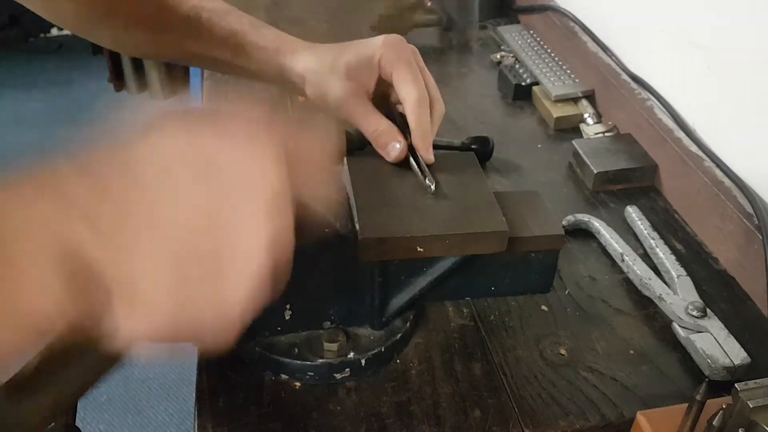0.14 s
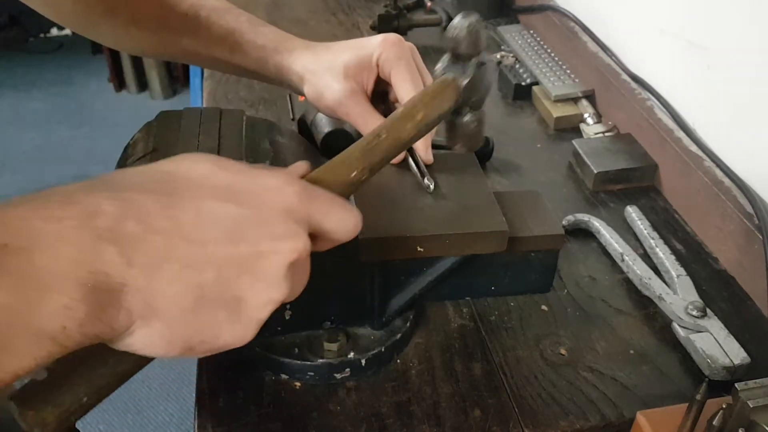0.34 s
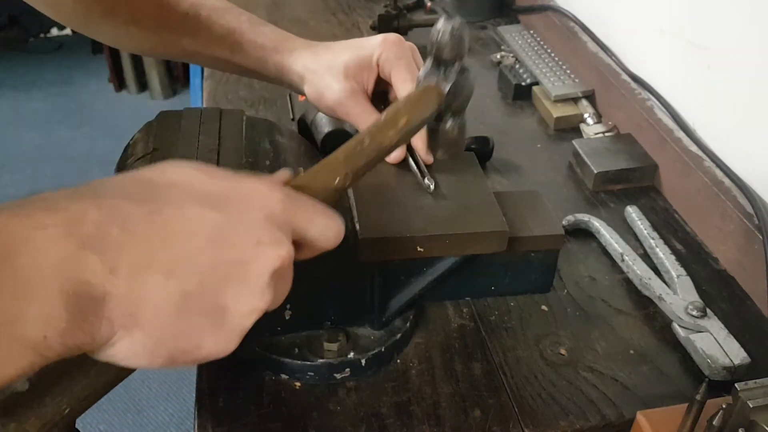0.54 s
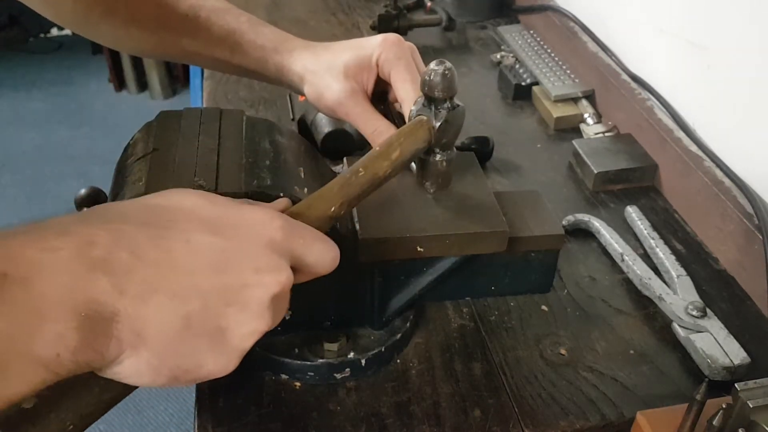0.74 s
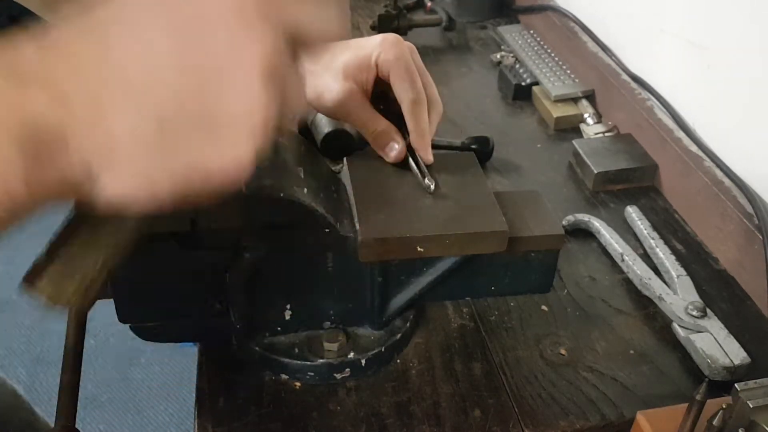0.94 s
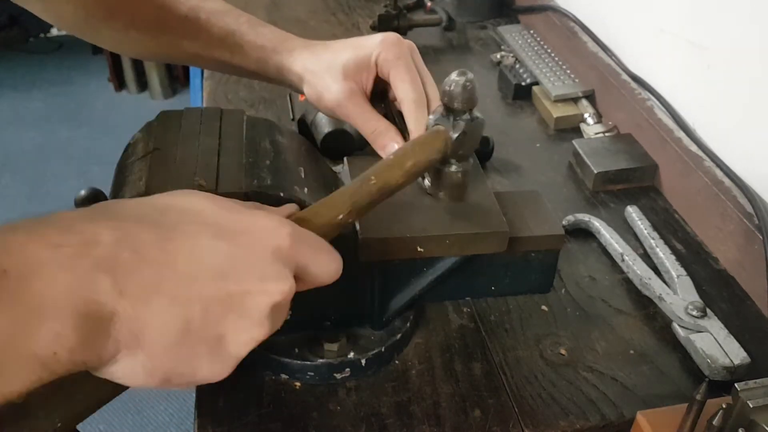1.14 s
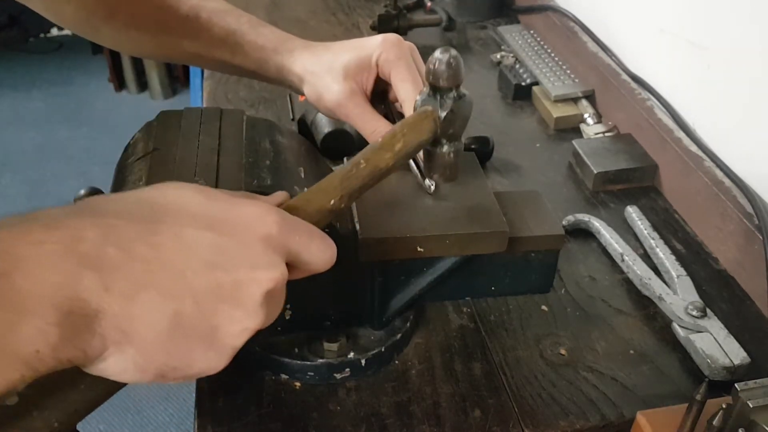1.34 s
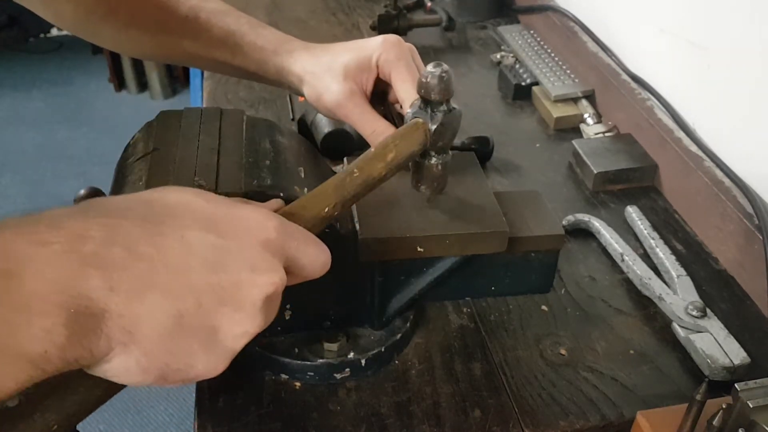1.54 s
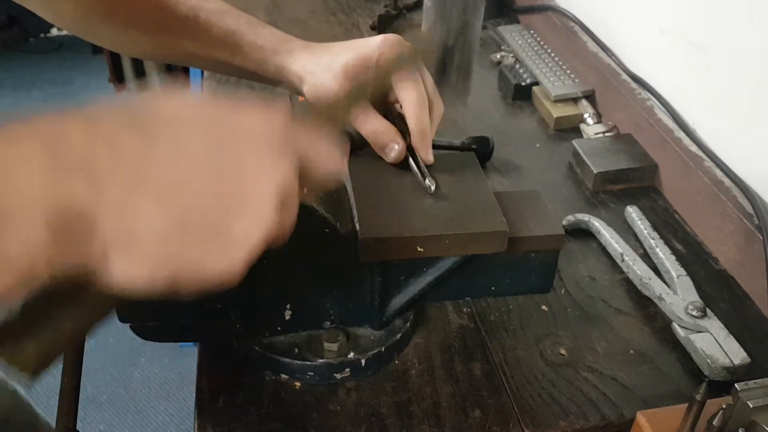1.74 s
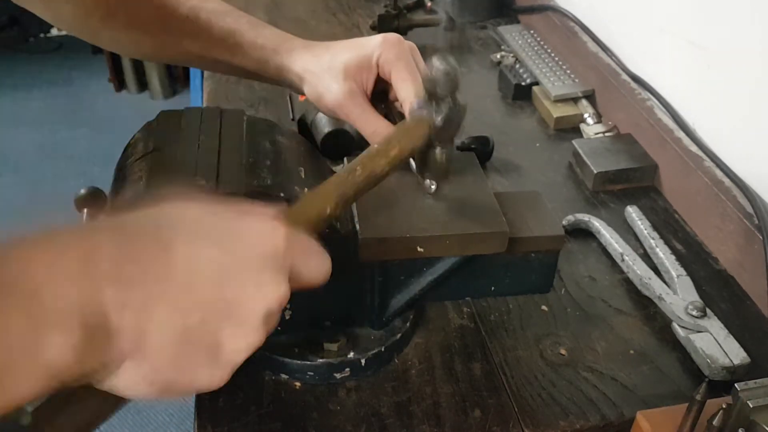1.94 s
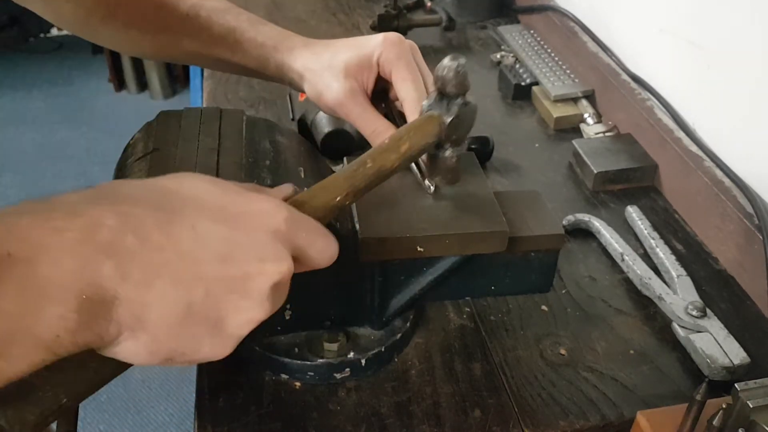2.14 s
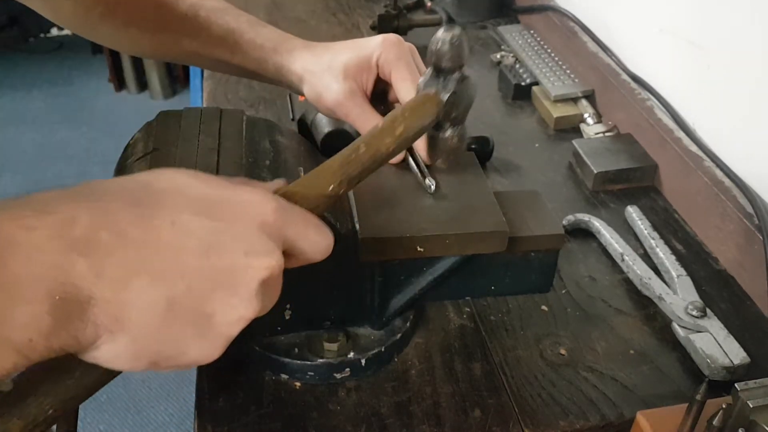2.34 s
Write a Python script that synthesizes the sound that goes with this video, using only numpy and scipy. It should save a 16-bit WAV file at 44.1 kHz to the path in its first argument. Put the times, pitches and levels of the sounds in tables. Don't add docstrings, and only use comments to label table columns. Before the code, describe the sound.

Hammer strikes a steel punch on a vice block: three hard ringing cracks, light taps between

```python
import sys
import numpy as np
from scipy import signal
from scipy.fft import rfft, irfft, next_fast_len
from scipy.io import wavfile
from scipy.ndimage import uniform_filter1d

SR = 44100
rng = np.random.default_rng(int(sys.argv[2]) if len(sys.argv) > 2 else 0)


def store_wav(level_fs):
    pcm = np.round(np.clip(np.atleast_2d(level_fs), -1, 1) * 32767)
    wavfile.write(sys.argv[1], SR, pcm.T.astype(np.int16))


def gain_from_decibels(decibels):
    exponent = np.asarray(decibels, float) / 20
    return 10 ** exponent


N = 105840

# frequency in Hz, t60 in seconds.
ROOM_DECAY = [(100, 0.58), (700, 0.43), (2000, 0.44), (4900, 0.32), (6500, 0.32), (10000, 0.18),
              (13000, 0.19), (15500, .27)]
# frequency in Hz, left-right likeness (1 = mono).
STEREO_LIKENESS = [(30, 0.27), (70, 1), (150, 0.94), (350, 0.86), (700, .3), (1500, 0.15), (5000, 0.03),
                   (12000, 0)]


def along(points, hz):
    f, v = np.transpose(points)
    return np.interp(np.log(hz + 1), np.log(f + 1), v)


def coloured(x, spectrum, tilt_db=0):
    m = 2 * next_fast_len(x.shape[-1] // 2 + 4096)
    hz = np.fft.rfftfreq(m, 1 / SR)
    response_db = along(spectrum, hz) + tilt_db * np.log2(hz / 1000 + .1)
    cepstrum = irfft(np.log(gain_from_decibels(response_db)), m)
    cepstrum = cepstrum * np.r_[1, np.full(m // 2 - 1, 2), 1, np.zeros(m // 2 - 1)]
    return irfft(rfft(x, m) * np.exp(rfft(cepstrum)), m)[..., :x.shape[-1]]


def add(track, s, sound):
    i = round(s * SR)
    first = max(i, 0)
    part = sound[..., max(-i, 0):][..., :N - first]
    track[..., first:first + part.shape[-1]] += part


def noise(size, spectrum, t60=None, tilt_db=0):
    raw = coloured(rng.standard_normal((2, size)), spectrum, tilt_db)
    hz, t, z = signal.stft(raw / raw.std(), SR, nperseg=512)
    likeness = np.clip(along(STEREO_LIKENESS, hz), -1, 1)
    turn = np.arccos(likeness)[:, None] / 2
    fade = 1
    if t60 is not None:
        fade = gain_from_decibels(-60 * t / along(t60, hz)[:, None])
    mid = z[0] * np.cos(turn)
    side = z[1] * np.sin(turn)
    stereo = np.array([mid + side, mid - side]) * fade
    return signal.istft(stereo, SR, nperseg=512)[1][:, :size]


def ring(modes, t, rise_s, wander, spread_db=2):
    hz, db, t60 = np.transpose(modes)[:, :, None]
    apart = np.sqrt(1 - np.clip(along(STEREO_LIKENESS, hz), 0, 1))
    step = 63
    steps = rng.standard_normal((3, len(modes), len(t) // step + 1)) * wander * np.sqrt(step / SR)
    walk = np.repeat(np.cumsum(steps, axis=2), step, axis=2)
    walk = uniform_filter1d(walk, size=step, axis=2)[..., :len(t)]
    start_phase = 2 * rng.standard_normal((2, len(modes), 1))
    phase = walk[0] + apart * (walk[1:] + start_phase)
    level = gain_from_decibels(db + spread_db * rng.standard_normal(db.shape) - 60 * t / t60)
    partials = level * np.sin(2 * np.pi * hz * t + phase)
    return partials.sum(axis=1) * (1 - np.exp(-t / rise_s))


def workshop():
    # frequency in Hz, level in dB per Hz.
    floor_spectrum = [(25, 11), (70, 6), (130, -7), (300, -16.5), (640, -11.5), (2400, -21), (3200, -30.5),
                      (15800, -27)]
    return gain_from_decibels(-51.5) * noise(N, floor_spectrum)


def swings():
    # start in seconds, end in seconds, level in dB at the end.
    arm_swings = [
        (0.04, 0.201, -72.5),
        (0.952, 1.117, -65.5),
        (1.85, 2.02, -67.5),
    ]
    # frequency in Hz, level in dB per Hz.
    swish_spectrum = [(60, -19), (250, -4), (1200, -0.5), (2000, -4), (4000, -24), (9000, -39)]
    t = np.arange(N) / SR
    speed = np.zeros(N)
    for start, end, db in arm_swings:
        rise = np.clip((t - start) / (end - start), 0, 1) ** .8
        speed += gain_from_decibels(db) * rise * (t < end)
    return speed * noise(N, swish_spectrum)


def bending_wave(t):
    hz = 201 + (465 - 201) * np.exp(-t / 0.0198)
    level = gain_from_decibels(-1.5 - 60 * t / 0.075) * (1 - np.exp(-t / 0.0012))
    return level * np.sin(2 * np.pi * np.cumsum(hz) / SR)


def taps():
    # time in seconds, click level in dB, thud level in dB.
    contacts = [
        (0.731, -20.5, -27),
        (1.581, -23, -38.5),
        (1.5877, -28.5, -38),
        (1.903, -54, -67),
        (1.945, -60.5, -53),
    ]
    # frequency in Hz, level in dB, t60 in seconds.
    click_modes = [(2290, -7, 0.034), (3730, -4, 0.043), (5010, -6.5, 0.032), (7440, -4, 0.035),
                   (8160, 3, 0.033), (11800, -12, 0.034)]
    # frequency in Hz, level in dB, t60 in seconds, delay in seconds.
    thud_modes = [(74.3, -6.5, 0.43, 0.016), (127.8, -3, .35, 0.014), (252.4, -5, 0.23, 0.0012),
                  (890, -5, 0.042, 0.0027)]
    bright = [(200, -10.5), (2000, -5), (4200, -8.5), (6000, 0), (8600, -8), (15500, 3)]  # (Hz, dB per Hz)
    out = np.zeros((2, N))
    t = np.arange(SR // 3) / SR
    glide = bending_wave(t)
    for s, click_db, thud_db in contacts:
        click = ring(click_modes, t, 0.00011, wander=25) / 3
        click = click + gain_from_decibels(-2 - 60 * t / 0.021) * noise(len(t), bright)
        echo = gain_from_decibels(-20) * noise(len(t), bright, ROOM_DECAY)
        add(out, s, gain_from_decibels(click_db) * (click + echo))
        add(out, s + .011, gain_from_decibels(thud_db) * glide * gain_from_decibels([[.5], [-.5]]))
        for hz, db, t60, delay_s in thud_modes:
            add(out, s + delay_s, gain_from_decibels(thud_db) * ring([(hz, db, t60)], t, 0.0016, wander=10))
    return out


def blows():
    # time in seconds, strength in dB, bench shake in dB, crack in dB,
    # brightness in dB per octave.
    strikes = [
        (-.36, 12.5, 5, 9, -3.5),
        (0.2175, 20, -2, -6.5, 1.5),
        (1.123, 21.5, -2, -6.5, 0.42),
        (1.9897, 23.5, -11, -7, 0.74),
    ]
    # frequency in Hz, level in dB per Hz.
    crack_spectrum = [(120, -37), (200, -12), (760, 1.5), (1270, -8.5), (2300, -4.5), (3700, -6),
                      (8000, -11.5), (15800, -10)]
    # frequency in Hz, level in dB, t60 in seconds.
    punch_modes = [(735.7, 2.5, 0.03), (1815, -4, 0.053), (2352, 4.5, 0.014), (3667, -5.5, 0.05),
                   (4600, -17, .03), (6930, -11.5, 0.021), (8420, -9, 0.049), (12407, -16.5, .02)]
    # frequency in Hz, level in dB, t60 in seconds.
    vice_modes = [(528, -8, .26), (586, -7.5, .33), (677.3, -7.5, .52), (737, -4, .42), (778, -7.5, .46),
                  (1407, -6.5, .3), (1680, -9.5, 0.43), (1768, -14, .35), (1897, -14, .33),
                  (2310, -15.5, 0.51), (2430, -14.5, 0.41), (3360, -13.5, .21), (3800, -17, .26),
                  (3830, -15.5, 0.33)]
    # frequency in Hz, level in dB, t60 in seconds.
    bench_modes = [(78.2, -20.5, .7), (123.8, 1, 0.31), (150.5, -4.5, 0.36), (243.7, -9.5, 0.38),
                   (295, -6.5, .33), (352.2, -6, 0.44), (470.5, -12, .3)]
    # frequency in Hz, level in dB per Hz.
    echo_spectrum = [(90, -32), (200, -12.5), (460, -9), (720, -6), (950, -10), (3400, -13), (8500, -20),
                     (15000, -27)]
    out = np.zeros((2, N))
    t = np.arange(SR * 3 // 4) / SR
    for s, db, shake_db, snap_db, tilt_db in strikes:
        crack_level = gain_from_decibels(-9 + snap_db - 60 * t / 0.024)
        crack = crack_level * noise(len(t), crack_spectrum, tilt_db=tilt_db)
        punch = gain_from_decibels(-9.5 + snap_db) * ring(punch_modes, t[:SR // 8], .0002, wander=24)
        vice = gain_from_decibels(-21) * ring(vice_modes, t, 0.0038, wander=10)
        bench = gain_from_decibels(-17.5 + shake_db) * ring(bench_modes, t, .022, wander=8.8)
        echo_level = gain_from_decibels(-17.5) * (1 - np.exp(-t / .003))
        echo = echo_level * noise(len(t), echo_spectrum, ROOM_DECAY, tilt_db=tilt_db)
        add(out, s, gain_from_decibels(db) * (crack + vice + bench + echo))
        add(out, s, gain_from_decibels(db) * punch)
    return out


def scene():
    return workshop() + swings() + taps() + blows()


def roll_off(x):
    return signal.sosfilt(signal.butter(12, 16470, fs=SR, output="sos"), x)


def record(dry):
    # frequency in Hz, level in dB.
    mic_response = [(25, -24), (75, 0), (4930, 0), (5060, -11), (8800, -8), (9150, -15), (12500, -9),
                    (15500, -7)]
    # time in seconds, gain in dB.
    gain_curve = [(0, 3), (0.227, -0.5), (0.232, -11.5), (.32, -10.5), (.6, -10), (.88, -10), (1.13, -4),
                  (1.137, -12.5), (1.229, -12.5), (1.5, -12), (1.8, -11), (1.989, -5.5), (1.997, -16.5),
                  (2.1, -8), (2.2, -7.5), (2.4, -5.5)]
    # frequency in Hz, level in dB.
    band_limit = [(15600, 0), (16000, -14), (16500, -60)]
    s, gain_db = np.transpose(gain_curve)
    x = coloured(dry, mic_response) * gain_from_decibels(np.interp(np.arange(N) / SR, s, gain_db))
    ceiling, hardness = .9, 4.9
    x = x / (1 + np.abs(x / ceiling) ** hardness) ** (1 / hardness)
    mix = coloured(x, band_limit)
    return roll_off(mix)


dry = scene()
out = record(dry)
store_wav(out)
```